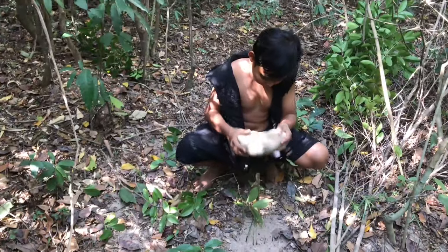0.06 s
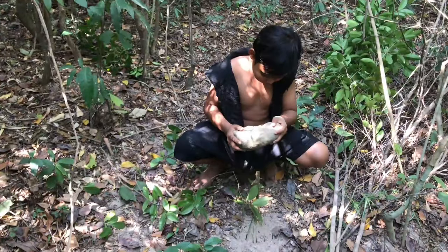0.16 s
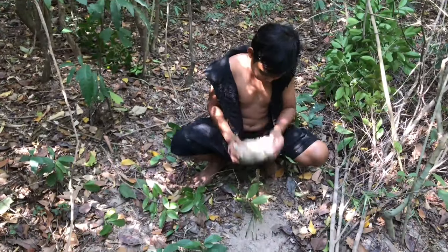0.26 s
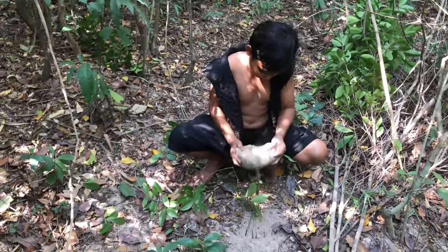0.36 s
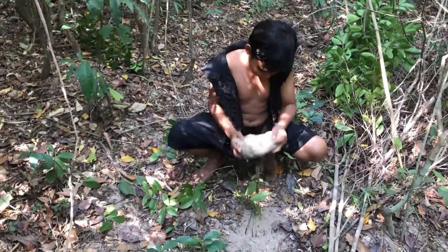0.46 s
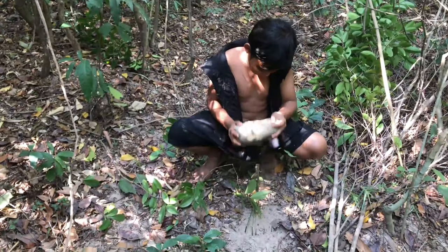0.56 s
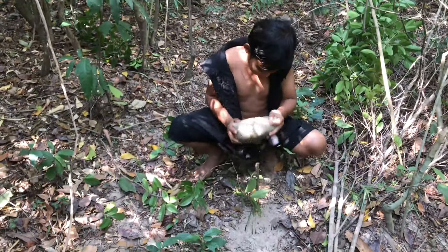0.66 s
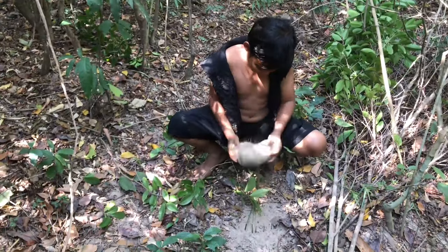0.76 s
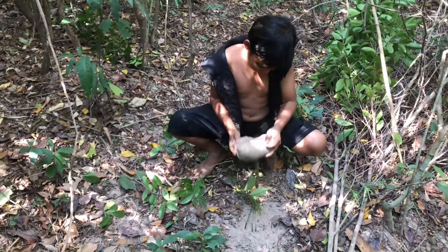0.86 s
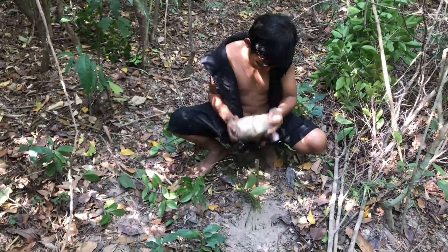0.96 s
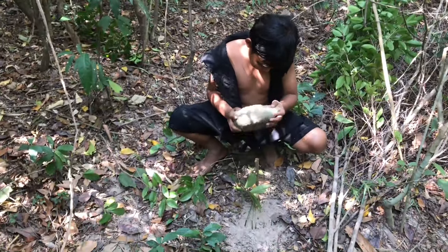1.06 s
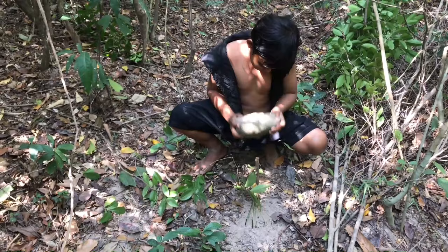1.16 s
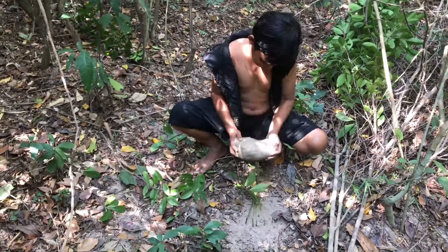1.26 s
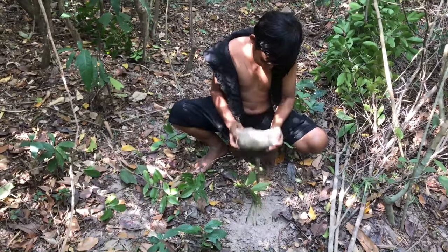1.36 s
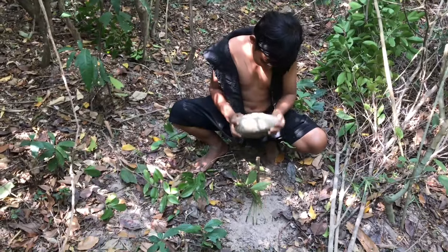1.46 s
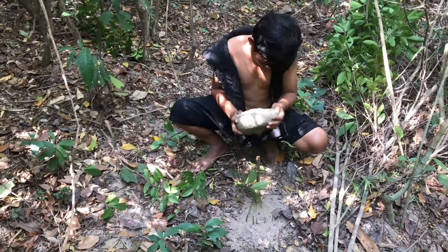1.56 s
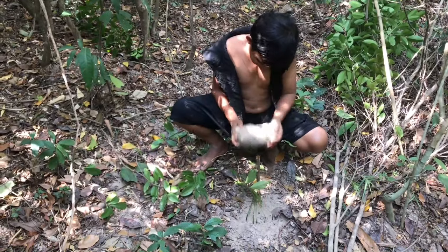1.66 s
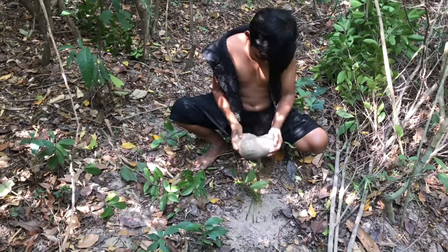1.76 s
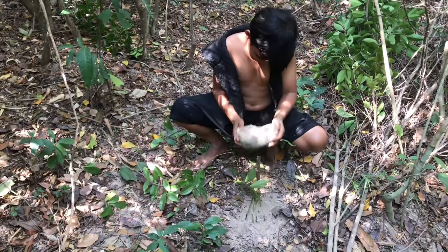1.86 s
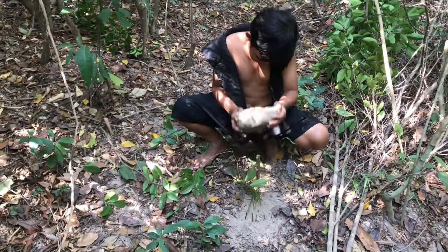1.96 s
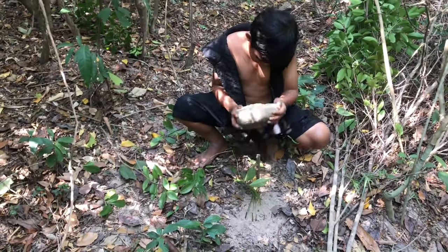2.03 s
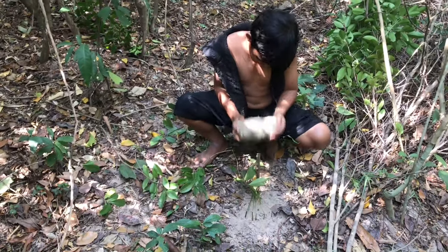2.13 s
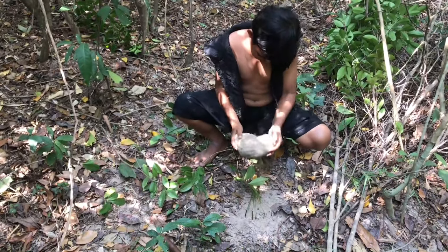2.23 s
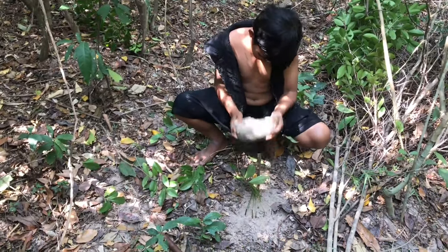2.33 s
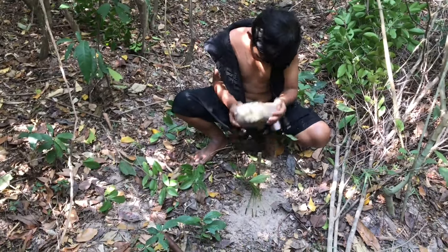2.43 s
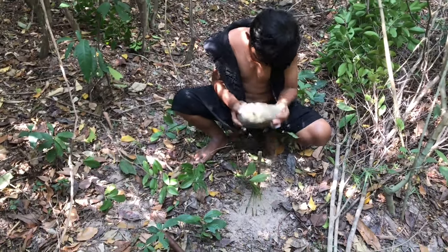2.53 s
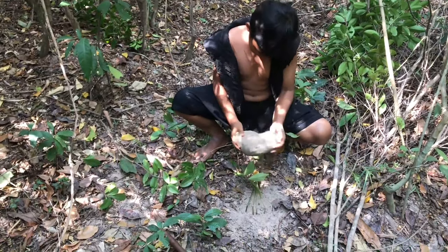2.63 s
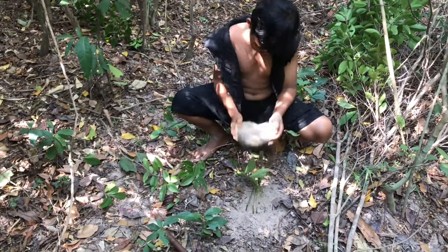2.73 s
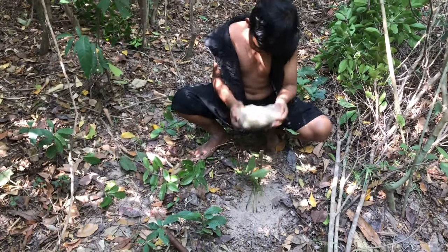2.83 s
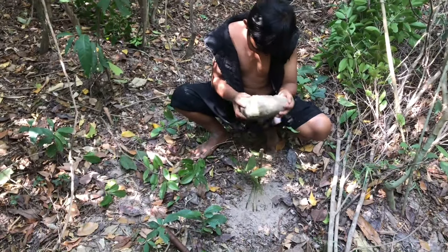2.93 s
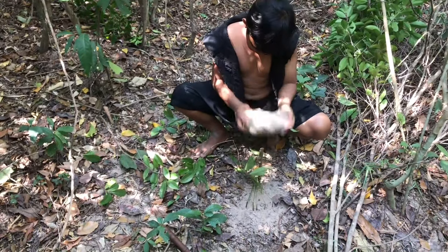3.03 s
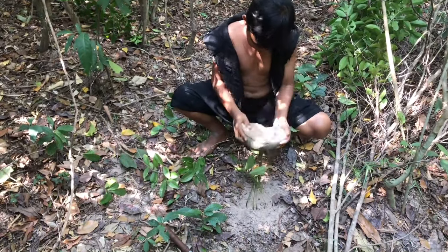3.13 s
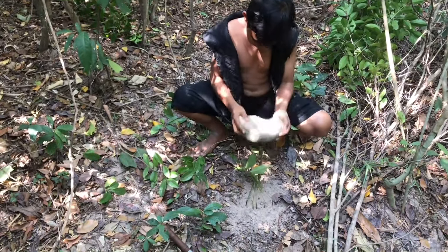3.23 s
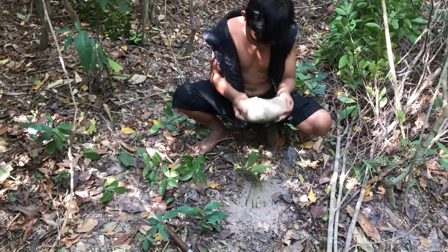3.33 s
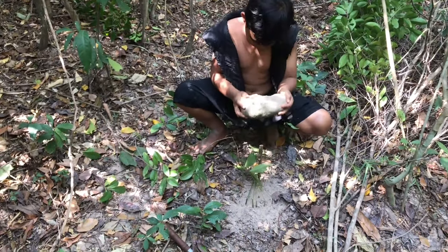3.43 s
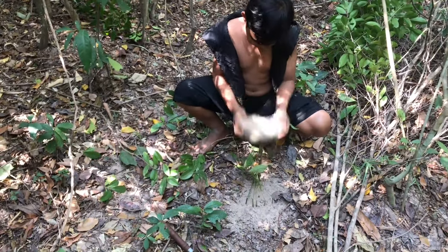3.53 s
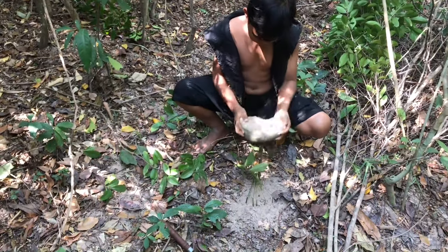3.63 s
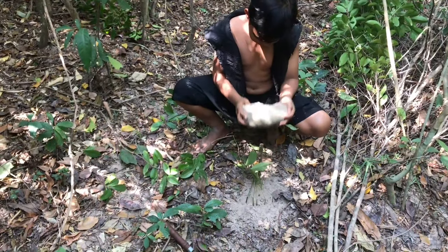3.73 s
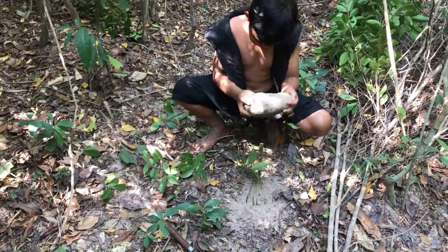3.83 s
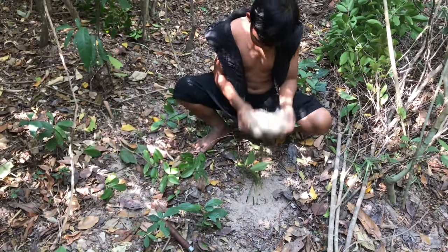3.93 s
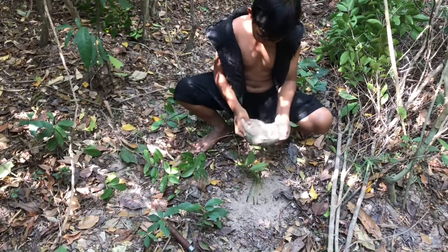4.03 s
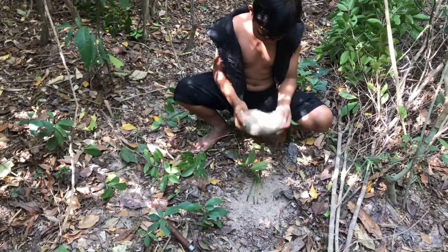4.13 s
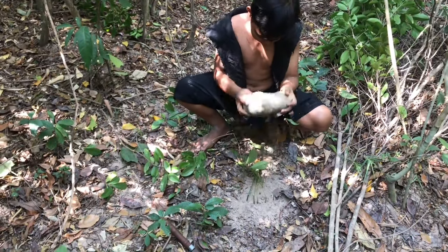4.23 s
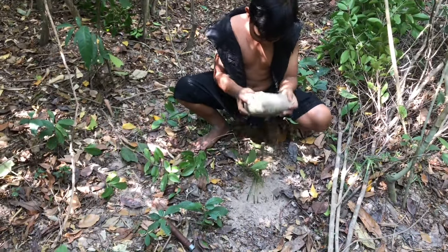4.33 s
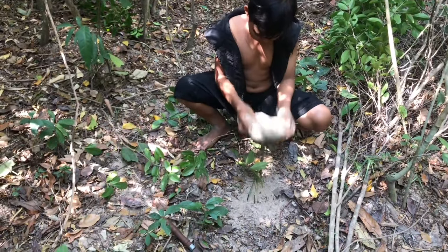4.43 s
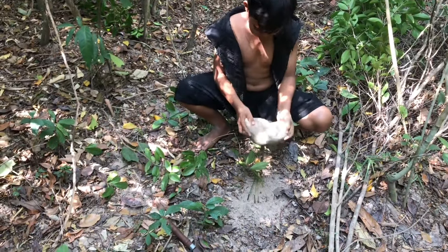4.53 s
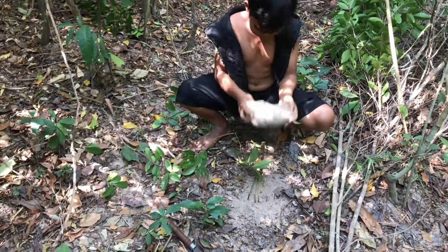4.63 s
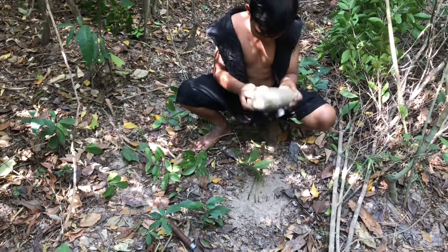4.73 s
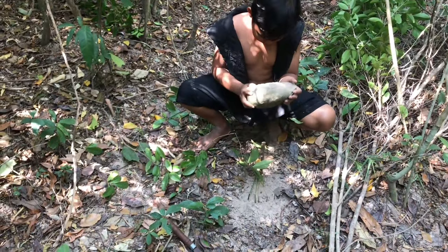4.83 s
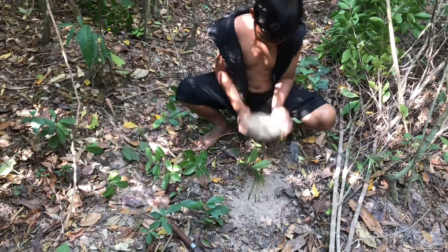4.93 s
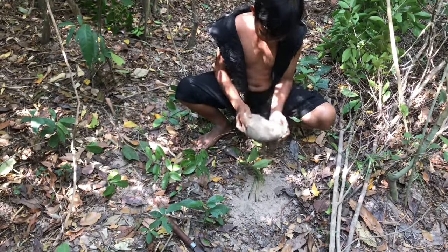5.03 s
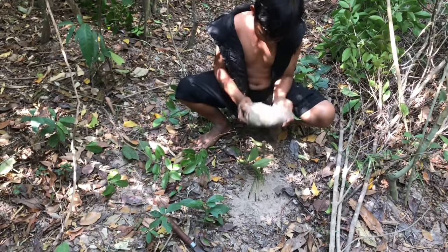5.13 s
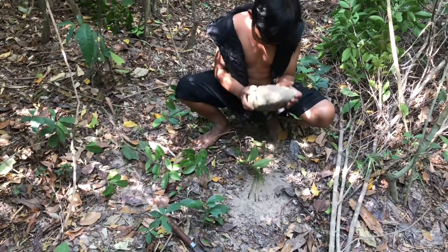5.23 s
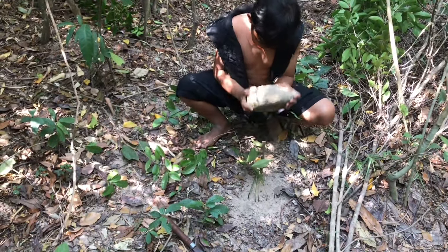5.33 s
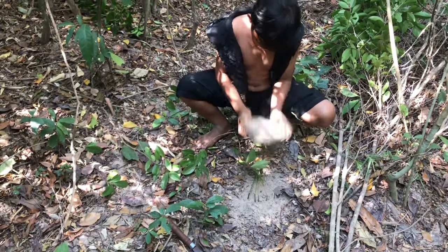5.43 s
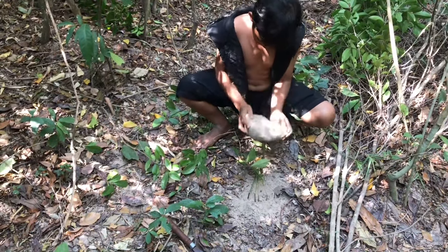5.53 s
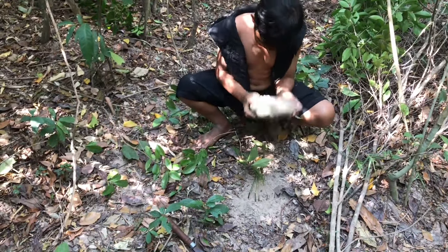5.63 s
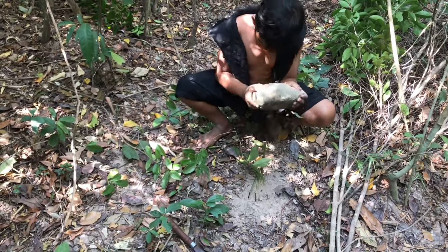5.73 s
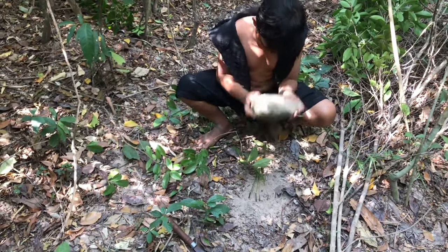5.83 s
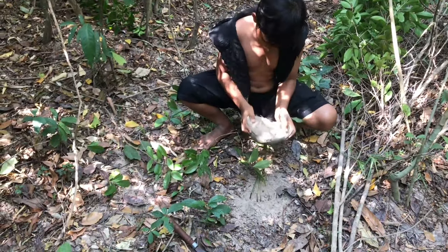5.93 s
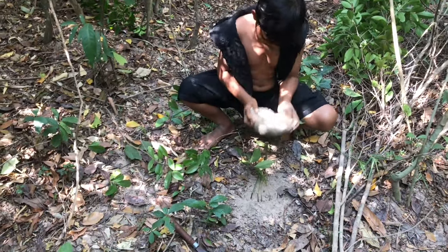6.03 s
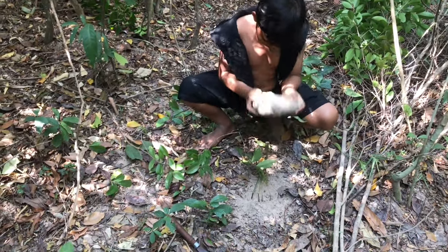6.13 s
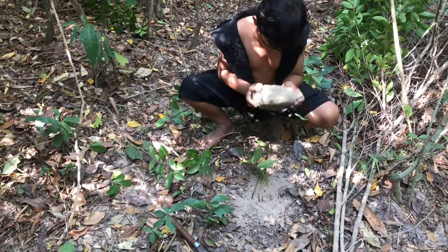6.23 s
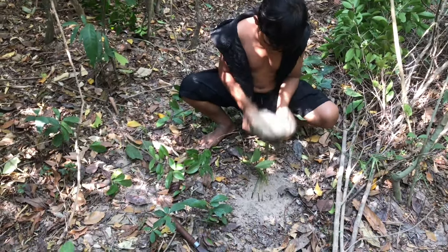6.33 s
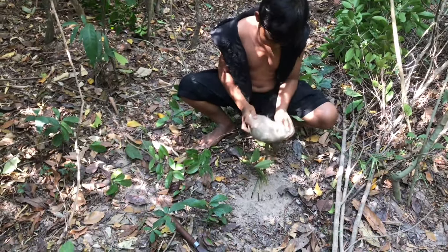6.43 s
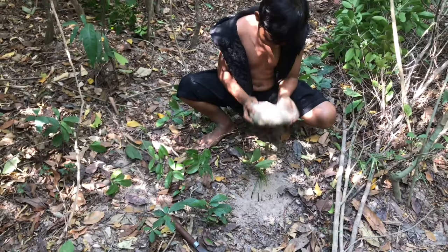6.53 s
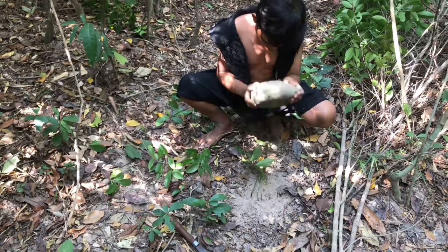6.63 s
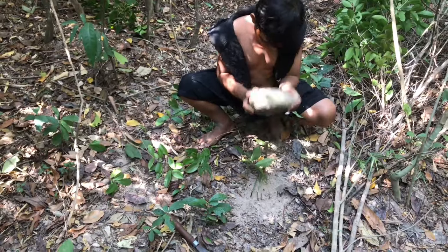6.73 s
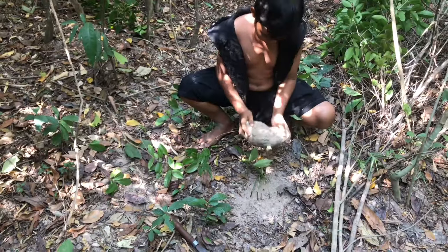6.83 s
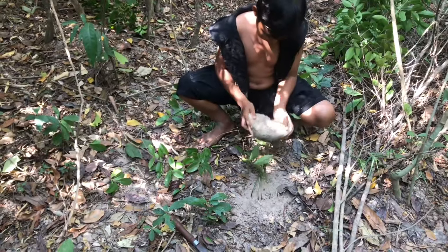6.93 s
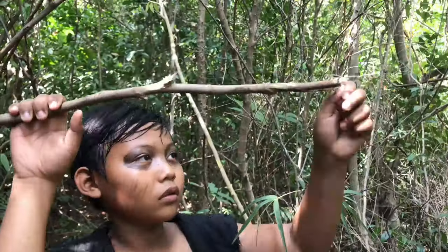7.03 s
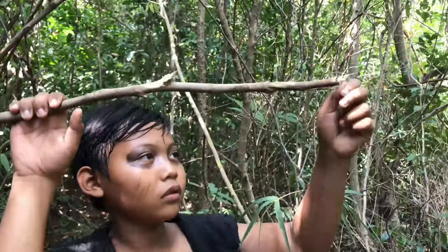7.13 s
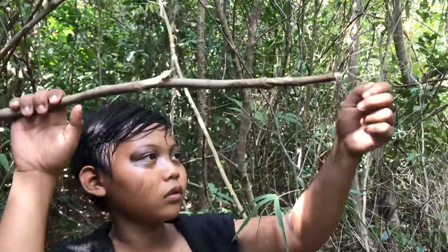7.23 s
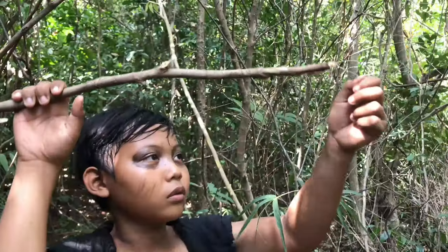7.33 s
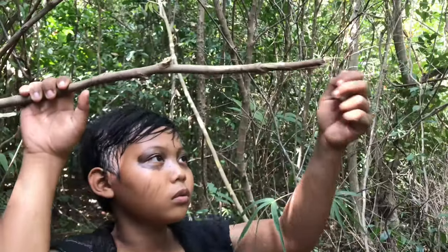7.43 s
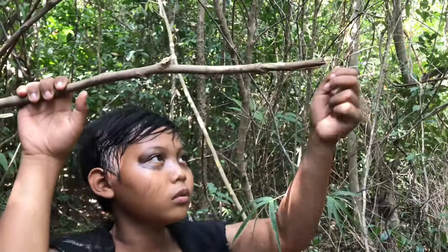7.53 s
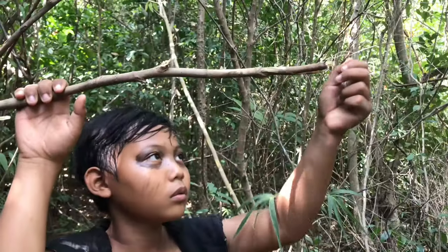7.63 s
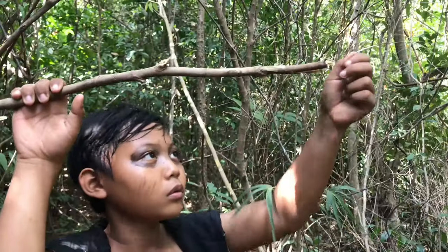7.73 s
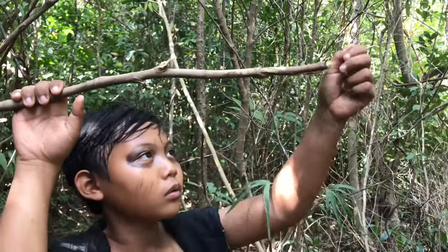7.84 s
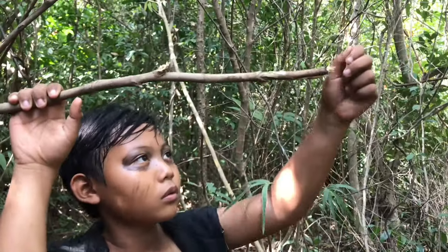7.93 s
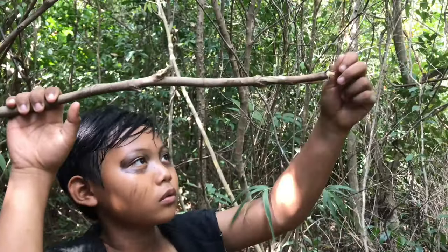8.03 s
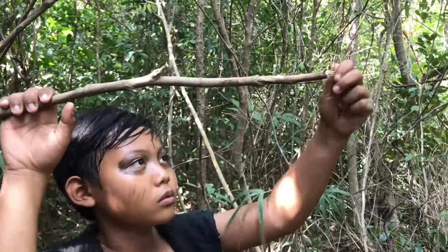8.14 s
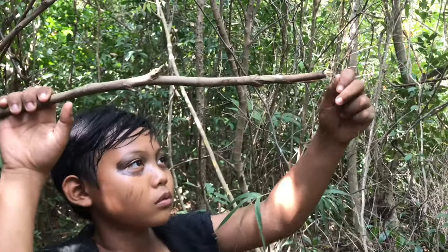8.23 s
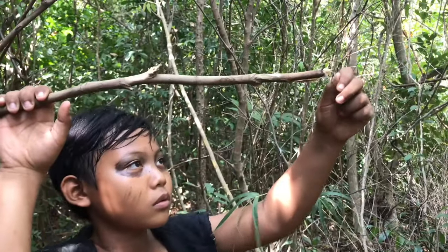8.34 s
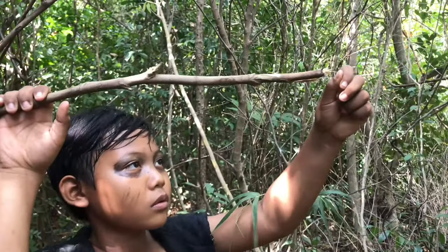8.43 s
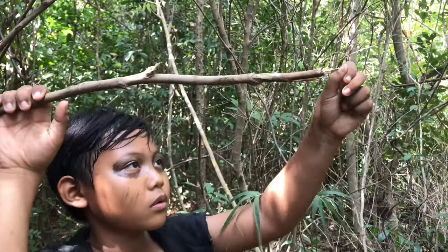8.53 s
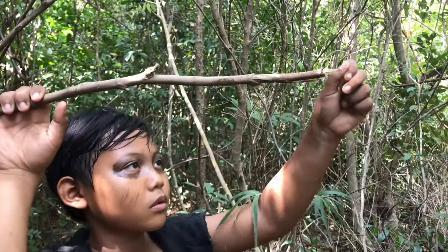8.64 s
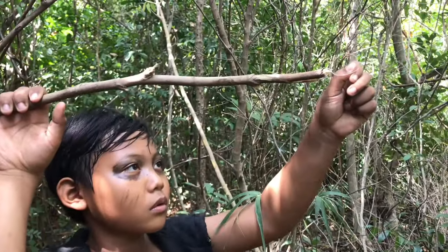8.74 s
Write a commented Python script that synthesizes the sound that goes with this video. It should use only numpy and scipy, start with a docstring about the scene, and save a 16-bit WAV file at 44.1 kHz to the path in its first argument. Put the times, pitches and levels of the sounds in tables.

```python
"""A forest clearing, where a stone held in both hands pounds bare ground about twice a second.
Each impact excites damped modes, a clack in the stone and a dull thud in the packed earth, and
crushes grit into noise; often the stone rocks and touches again. Dry leaves crackle, and trunks
scatter a short echo. A few soft, low bumps and a breeze come near the end; a faint hum lies under it all."""
import sys
import numpy as np
from scipy import signal
from scipy.fft import rfft, irfft
from scipy.io import wavfile
from scipy.ndimage import uniform_filter1d

SR = 44100
rng = np.random.default_rng(int(sys.argv[2]) if len(sys.argv) > 2 else 0)


def master(y):
    """Save y as 16-bit WAV."""
    cut = np.clip(np.atleast_2d(y).T, -1, 1)
    pcm = np.round(cut * 32767)  # scale
    wavfile.write(sys.argv[1], SR, pcm.astype(np.int16))


N = 387198
TIME = np.arange(N) / SR
AGE = np.arange(SR // 4) / SR  # time since a contact [s]
LEAD_S = .004  # from the first brush of loose soil to the hard contact
WORK_END_S = 7.05


def gain_of(db):
    """Amplitude grows tenfold with every 20 dB."""
    return 10 ** (np.asarray(db) / 20)


def unit_rms(x):
    """Normalisation to unit mean power."""
    return x / np.sqrt(np.mean(x ** 2) + 1e-20)


def curve_at(points, hz):
    """Interpolation on a logarithmic frequency axis."""
    f, value = np.transpose(points)
    return np.interp(np.log(hz + 1), np.log(f + 1), value)


def add(mix, s, sound):
    """Superposition: a sound joins the mix at time s."""
    part = mix[round(s * SR):][:len(sound)]
    part += sound[:len(part)]


def noise(shape_db, size):
    """Spectral shaping: white noise weighted by shape_db(Hz), at unit rms."""
    hz = np.fft.rfftfreq(size, 1 / SR)
    return unit_rms(irfft(rfft(rng.standard_normal(size)) * gain_of(shape_db(hz)), size))


def swell(middle_s, half_s):
    """A Gaussian envelope, down to 1/e at half_s from its middle."""
    return np.exp(-((TIME - middle_s) / half_s) ** 2)


def envelope(rise, t60):
    """Exponential damping after a smooth rise: 60 dB are lost in t60 seconds."""
    onset = np.sin(np.pi / 2 * np.minimum(AGE / rise, 1)) ** 2
    return onset * gain_of(-60 * np.maximum(AGE - rise, 0) / t60)


def ring(modes, hz, rise):
    """Free vibration: a sum of damped modes at multiples of hz."""
    return sum(gain_of(db) * envelope(rise, t60) * np.sin(2 * np.pi * hz * k * AGE)
               for k, db, t60 in modes)


def burst(shape_db, rise, t60):
    """A noise transient, coloured by shape_db(Hz) and delayed LEAD_S by a linear phase."""
    fade, hz = envelope(rise, t60), np.fft.rfftfreq(len(AGE), 1 / SR)
    spectrum = rfft(fade * rng.standard_normal(len(AGE)))
    spectrum /= np.sqrt(uniform_filter1d(abs(spectrum) ** 2, size=300))  # flat, with narrow chance peaks
    delay = np.exp(-2j * np.pi * hz * LEAD_S)
    coloured = irfft(spectrum * gain_of(shape_db(hz)) * delay, len(AGE))
    return unit_rms(coloured) * np.sqrt(np.mean(fade ** 2))


def background():
    """Broadband forest air and a far hum that wavers, as narrowband noise does; the bass swells twice."""
    # spectrum of the air: (frequency [Hz], relative density [dB])
    air_spectrum = [(18, -47), (32, -1), (45, 2), (100, 3.5), (190, -2), (300, 1), (430, -5), (560, -11),
                    (1300, -20), (2200, -25.5), (5400, -32.5), (7000, -32.5), (11500, -36.5), (14500, -58)]
    # bands of the hum: (centre [Hz], width [Hz], relative level [dB])
    hum_bands = [(52.55, 2.5, -62), (78.9, 6.6, -59.5), (256.5, 16.6, -54.5), (288.7, 19.2, -57.5),
                 (336.4, 18.3, -60)]
    # bass swells: (time [s], half length [s], boost [dB])
    bass_swells = [(1.13, 0.16, 7), (5.88, 0.24, 9.5)]
    air = gain_of(-55.5) * noise(lambda hz: curve_at(air_spectrum, hz), N)
    hum = sum(gain_of(db) * noise(lambda f: -20 * np.log10(1 + ((f - hz) / width * 1.88) ** 2), N)
              for hz, width, db in hum_bands)
    bass = signal.sosfiltfilt(signal.butter(3, 140, fs=SR, output="sos"), air + hum)
    rumble = bass * gain_of(1.27 + sum(db * swell(s, half_s) for s, half_s, db in bass_swells))
    upper = gain_of(-.72) * (air + hum - bass)
    calm = np.clip((TIME - WORK_END_S) / .3, 0, 1)  # the background grows a little quieter after 7.05 s
    return (rumble + upper) * gain_of(-.56 * calm)


def leaf_litter():
    """Random pulses modulate noise into a rustle, which adds in power to the even hiss of foliage."""
    # rustles as the body shifts: (time [s], half length [s], level [dB])
    rustles = [(.05, 0.081, -74.5), (0.552, 0.055, -60), (0.742, 0.052, -61), (1.11, 0.17, -67.5),
               (1.34, 0.12, -71), (2.344, 0.49, -75.5), (5.89, 0.51, -76.5), (7.41, .06, -69.5)]
    # spectrum of leaves: (frequency [Hz], relative density [dB])
    leaf_spectrum = [(800, -37), (2500, 6), (5500, 4), (10000, -1), (15000, 6)]
    crackles_per_s, stir_db, hiss_db = 260, -80, -78
    size_db = 5.5 * np.minimum(rng.exponential(1, N), 3.5)
    grains = gain_of(size_db) * (rng.random(N) < crackles_per_s / SR)
    flutter = unit_rms(signal.oaconvolve(grains, envelope(rise=.0003, t60=.007))[:N])
    stirring = gain_of(stir_db) + sum(gain_of(db) * swell(s, half_s) for s, half_s, db in rustles)
    level = np.hypot(stirring * unit_rms(flutter + .4), gain_of(hiss_db))
    return level * noise(lambda hz: curve_at(leaf_spectrum, hz), N)


def snaps():
    """Brittle fracture: dry leaves and twigs snap until the work ends, faint ones as a Poisson process."""
    # distinct snaps: (time [s], level [dB], centre [Hz])
    distinct = [(.1055, -52.5, 9750), (.561, -48, 5000), (1.078, -60, 7000), (1.347, -56, 7800),
                (2.802, -59, 7240), (3.051, -54, 6400), (3.773, -53.5, 14000), (4.783, -43, 3340),
                (5.0745, -52, 4300), (5.25, -57, 7100), (5.416, -45, 13500), (5.427, -45, 13800),
                (5.752, -49.5, 3580), (6.099, -47.5, 4600), (6.438, -51.5, 10900), (6.971, -51.5, 2380),
                (7.025, -53, 2980), (8.592, -57, 1800)]
    faint_per_s, faint_db, faint_hz = 1.5, -59, 7500
    out = np.zeros(N)
    chance = rng.random((40, 3))
    times = np.cumsum(-np.log(1 - chance[:, 0])) / faint_per_s + LEAD_S
    faint = [(s, faint_db + 8 * (loud - .5), faint_hz * 2 ** (high - .5))
             for s, (_, loud, high) in zip(times, chance)]
    for s, db, centre_hz in distinct + faint:
        snap = burst(lambda hz: -8 * np.log2((hz + 1) / centre_hz) ** 2, rise=.0005, t60=.0087)
        if s < WORK_END_S:
            add(out, s - LEAD_S, gain_of(db) * snap)
    return out


def crunch(edge_hz, chink_hz, chink_db):
    """Granular noise: the stone brushes soil, crushes sand and chinks on a pebble; crumbs settle."""
    # spectrum of crushed grit: (frequency [Hz], relative density [dB])
    grit_spectrum = [(300, -34), (800, 0.5), (1300, 6.5), (2100, 2.5), (2900, -3.5), (3900, -3),
                     (5500, -5.5), (8000, -6), (15000, -17)]

    def sand(hz):
        return curve_at(grit_spectrum, hz) - 10 * np.log10(1 + (hz / edge_hz) ** 5.4)

    def contact(hz):
        return sand(hz) + chink_db * np.exp(-(np.log2((hz + 1) / chink_hz) / .29) ** 2)
    grains = unit_rms(uniform_filter1d(rng.exponential(1, len(AGE)) ** 3, size=40))
    loose = grains * noise(sand, len(AGE))
    brush = gain_of(-15) * envelope(rise=.005, t60=.02)
    crumbs = gain_of(-24) * envelope(rise=.0053, t60=.082)
    return burst(contact, rise=.0014, t60=.0083) + loose * (brush + crumbs)


def fizz():
    """Amplitude modulation shapes high noise into a quick hiss and a faint, grainy tail."""
    # the high fizz after each blow, with a lift near 14 kHz: (frequency [Hz], relative density [dB])
    fizz_spectrum = [(2000, -61), (7000, -5), (11500, -8.5), (14000, -5.5), (16000, -9.5)]
    grains = unit_rms(uniform_filter1d(rng.exponential(1, len(AGE)) ** 3, size=30))
    attack = envelope(rise=.0021, t60=.029)
    tail = gain_of(-17) * grains * envelope(rise=.014, t60=.077)
    return noise(lambda hz: curve_at(fizz_spectrum, hz), len(AGE)) * (attack + tail)


def clack(hz):
    """Heavily damped modes give a few hard cycles, too short-waved to carry bass; a faint rattle follows."""
    # modes of the struck stone: (frequency ratio, level [dB], t60 [s])
    stone_modes = [(.97, -2.5, 0.0062), (.84, -5.5, 0.0049), (1.1, -20.5, 0.052), (1.36, -13.5, 0.023)]
    # the stone's rattle: (centre [Hz], width [Hz], relative level [dB])
    rattle_band = (1030, 410, -31.5)
    centre_hz, width_hz, db = rattle_band
    low_cut = signal.butter(4, .64 * hz, "high", fs=SR, output="sos")
    knock = signal.sosfilt(low_cut, ring(stone_modes, hz, rise=.0015))
    rattle = noise(lambda f: -20 * np.log10(1 + ((f - centre_hz) / width_hz) ** 2), len(AGE))
    return knock + gain_of(db) * rattle * envelope(rise=.0057, t60=.079)


def thud(hz, rise):
    """Damped resonance: a dull thud glides from the blow's pitch up to a steady ring near 209 Hz."""
    # modes of the earth: (frequency ratio, level [dB], t60 [s])
    earth_modes = [(.84, -20, 0.084), (1.018, 1.73, 0.086), (1.42, -13, 0.09), (1.85, -12.5, 0.068),
                   (2.35, -21, 0.059)]
    settled_hz, settling_s = 209, .032
    base_hz = settled_hz + (hz - settled_hz) * np.exp(-AGE / settling_s)
    cycles = np.cumsum(base_hz) / SR
    return sum(gain_of(db) * envelope(rise, t60) * np.sin(2 * np.pi * k * cycles)
               for k, db, t60 in earth_modes)


def pounding():
    """Impact excitation: each blow thuds and fizzes; every contact clacks and crunches."""
    # blows: (time [s], clack level [dB], clack base [Hz], grit level [dB], pebble chink [Hz],
    # chink over grit [dB], fizz over grit [dB], thud level [dB], thud starting base [Hz], thud rise [s])
    blows = [(0.3001, -25.5, 1486, -28.5, 3800, 9, -30, -37.5, 202, 0.0015),
             (0.7501, -32.5, 820, -38, 3620, 9, -19, -30, 187, 0.0029),
             (1.2199, -25.5, 883, -33.5, 6500, 8, -12.5, -31, 195, 0.011),
             (1.6976, -27.5, 936, -37, 4050, 4, -9, -29.5, 206, 0.0068),
             (2.155, -18.5, 840, -35.5, 2350, 6.5, -18, -26.5, 192, 0.0064),
             (2.5944, -16, 810, -30, 2100, 3, -23, -19.5, 192, 0.0095),
             (3.0746, -18.5, 706, -32, 2100, 11.5, -17.5, -26.5, 199, .011),
             (3.5303, -25.5, 926, -36, 2040, 1, -13, -24.5, 160, 0.0021),
             (3.9608, -16.5, 873, -32, 1840, 3, -13, -19.5, 173, 0.0079),
             (4.4412, -22.5, 796, -32, 1630, 7.5, -20, -22.5, 170, 0.0014),
             (4.9459, -22, 845, -31, 2300, 11.5, -29, -18.5, 182, 0.0062),
             (5.4223, -17.5, 753, -34.5, 3450, 4, -9, -29, 206, 0.005),
             (5.8851, -24, 917, -28.5, 1960, 2, -25, -22, 164, 0.0015),
             (6.3442, -13, 936, -29.5, 3450, 8, -18.5, -19, 179, 0.0047),
             (6.801, -9.5, 940, -34, 3730, 12, -10.5, -19, 191, .012)]
    # the stone rocks and touches again: (time [s], clack level [dB], clack base [Hz], grit level [dB])
    rocks = [(.7555, -40, 766, -56), (1.2246, -22, 860, -33), (1.7033, -31, 690, -42.5),
             (2.1616, -25, 770, -29.5), (2.6028, -31, 800, -30.5), (2.611, -34, 780, -44),
             (3.9706, -31, 740, -34.5), (4.458, -31, 1126, -49), (4.475, -47, 1160, -55),
             (4.9555, -31, 1170, -60), (5.4252, -16.5, 789, -33), (5.4294, -25, 835, -48),
             (5.892, -33, 1160, -41), (6.3538, -26, 1075, -37.5), (6.3605, -31, 1110, -54),
             (6.8049, -14, 830, -24.5), (6.8092, -20, 883, -43)]
    rocking_s, thud_lag_s, fizz_lead_s = .05, .0011, .00061
    out = np.zeros(N)
    for start, clack_db, clack_hz, grit_db, chink_hz, chink_db, fizz_db, thud_db, thud_hz, rise in blows:
        add(out, start + thud_lag_s, gain_of(thud_db) * thud(thud_hz, rise))
        add(out, start - fizz_lead_s, gain_of(grit_db + fizz_db) * fizz())
        edge_hz = 7370 * 2 ** (.0125 * fizz_db)  # less fizz goes with a duller crunch
        touches = [row for row in rocks if start < row[0] < start + rocking_s]
        for s, touch_db, touch_hz, crunch_db in [(start, clack_db, clack_hz, grit_db)] + touches:
            add(out, s, gain_of(touch_db) * clack(touch_hz))
            add(out, s - LEAD_S, gain_of(crunch_db) * crunch(edge_hz, chink_hz, chink_db))
    return out


def clearing_echo(x):
    """Scattering by trunks and foliage returns a short, thin echo."""
    # reverberation times: (frequency [Hz], t60 [s])
    decay_times = [(150, 0.033), (500, 0.2), (1200, 0.15), (4000, 0.18), (14000, 0.28)]
    echoes_per_s = 2500
    taps = rng.choice([-1., 1.], len(AGE)) * (rng.random(len(AGE)) < echoes_per_s / SR) * (AGE > .005)
    hz, t, spectra = signal.stft(taps, SR, nperseg=256)
    decay = gain_of(-60 * t / curve_at(decay_times, hz)[:, None])
    scatter = (hz / (hz + 400))[:, None]  # long waves pass the thin trunks
    tail = signal.istft(spectra * decay * scatter, SR, nperseg=256)[1]
    return signal.fftconvolve(x, tail / np.linalg.norm(tail))[:N]


def bumps():
    """A soft contact builds up slowly, so it excites only a few low swings and a muffled scuff."""
    # bumps: (time [s], level [dB], base frequency [Hz], t60 [s], scuff level [dB], scuff centre [Hz])
    contacts = [(5.995, -29, 199, 0.027, -48.5, 1000), (5.999, -23, 88, 0.069, -48.5, 700),
                (6.285, -23.5, 80.4, 0.038, -54.5, 746), (6.895, -19, 276, 0.01, -36.5, 740),
                (6.8971, -8.5, 76, 0.049, -50, 400), (6.928, -28, 70, .054, -54, 1150),
                (6.960, -25, 71, .049, -60, 500), (6.995, -24.5, 311, 0.036, -48, 430),
                (7.0047, -20, 273, 0.041, -49, 430)]
    give_s, rise_cycles = .0015, .36
    out = np.zeros(N)
    for s, db, hz, t60, scuff_db, scuff_hz in contacts:
        rise = give_s + rise_cycles / hz
        add(out, s, gain_of(db) * ring([(.91, 0, t60)], hz, rise))
        scuff = burst(lambda f: -7.5 * np.log2((f + 1) / scuff_hz) ** 2, rise=rise / 2, t60=.024)
        add(out, s - LEAD_S, gain_of(scuff_db) * scuff)
    return out


def breeze():
    """Far leaves add incoherently into one soft swell of noise."""
    foliage = noise(lambda hz: -2.5 * np.log2((hz + 1) / 2400) ** 2, N)
    return gain_of(-73.5) * swell(middle_s=7.51, half_s=.38) * foliage


def scene():
    """Direct and scattered sound superpose a few steps from the stone."""
    far = background() + breeze()
    near = leaf_litter() + pounding() + snaps()
    return (near + gain_of(-16.5) * clearing_echo(near) + bumps() + far)[None]


def record(dry):
    """Band limiting: filters pass 36 Hz to 16250 Hz."""
    cut = signal.sosfilt(signal.butter(6, 36, "high", fs=SR, output="sos"), dry)
    low_pass = signal.firwin(511, 16250, window=("kaiser", 9), fs=SR)
    return signal.oaconvolve(cut, low_pass[None], "same")


dry = scene()
out = record(dry)
master(out)
```